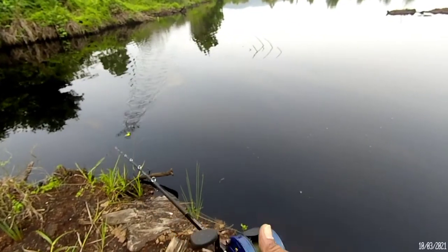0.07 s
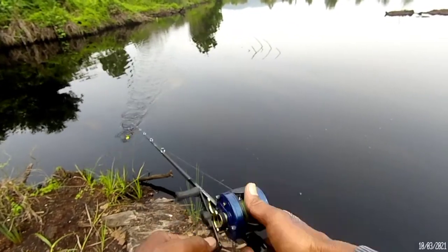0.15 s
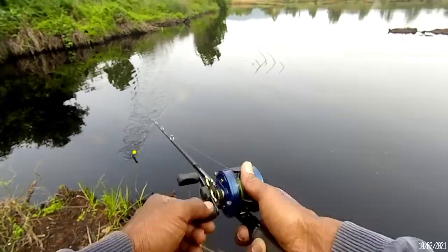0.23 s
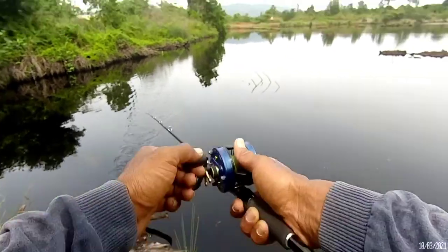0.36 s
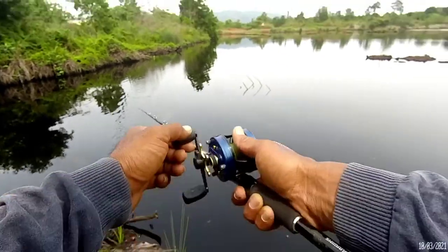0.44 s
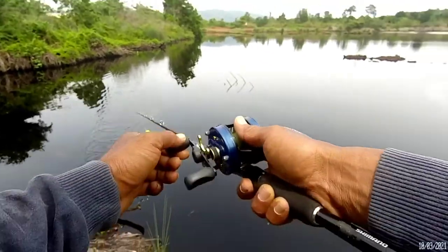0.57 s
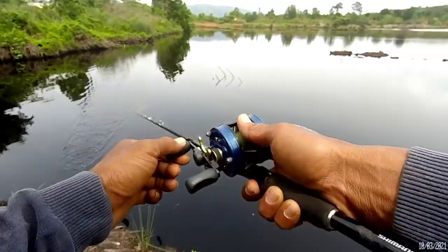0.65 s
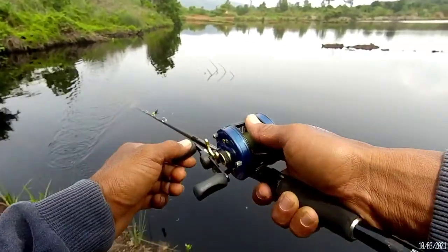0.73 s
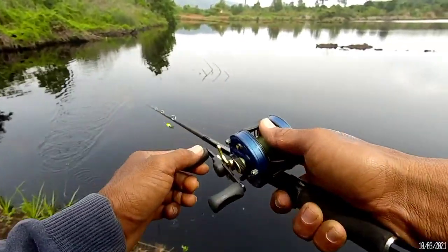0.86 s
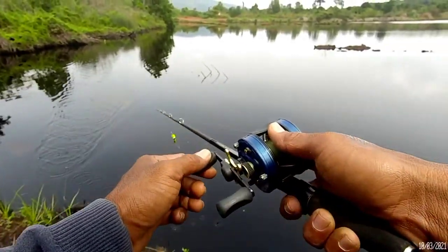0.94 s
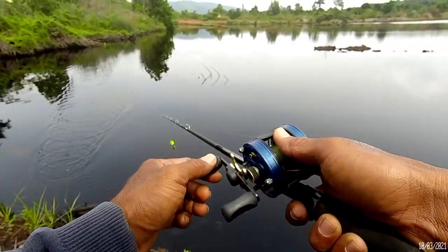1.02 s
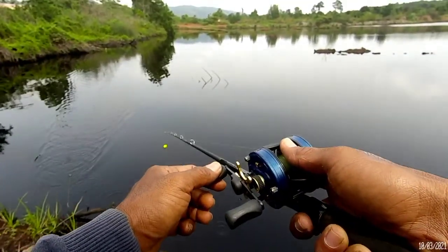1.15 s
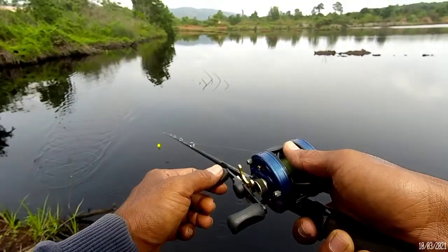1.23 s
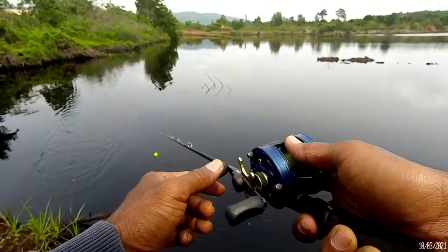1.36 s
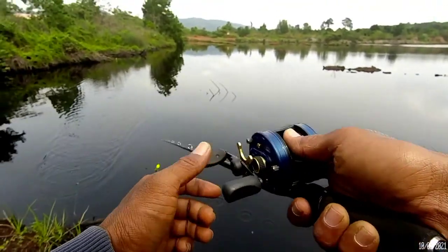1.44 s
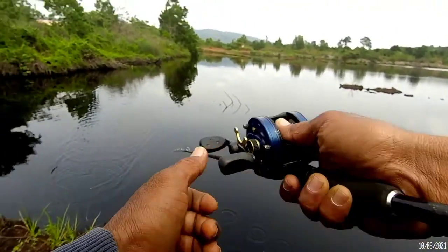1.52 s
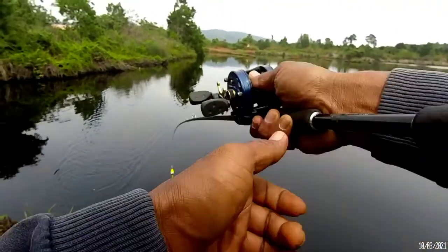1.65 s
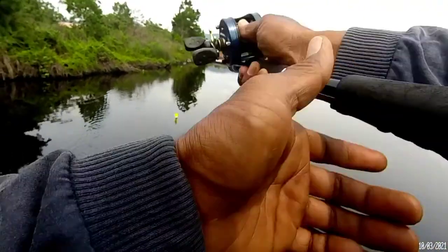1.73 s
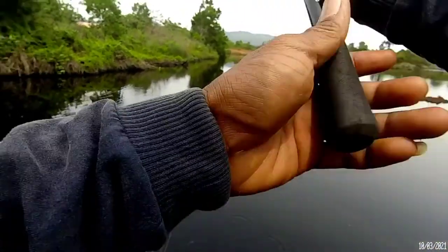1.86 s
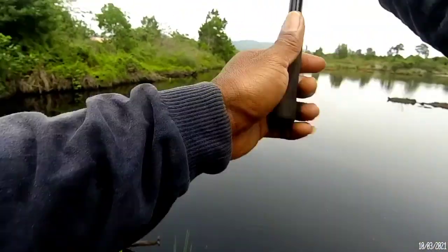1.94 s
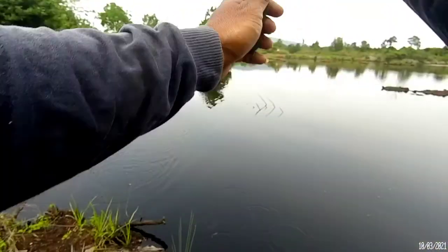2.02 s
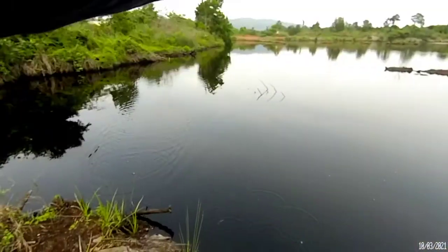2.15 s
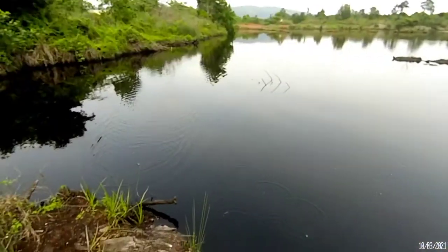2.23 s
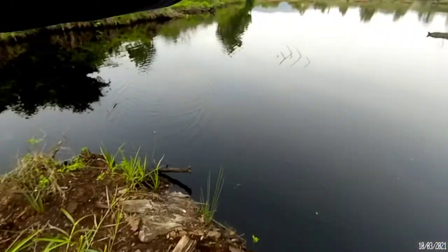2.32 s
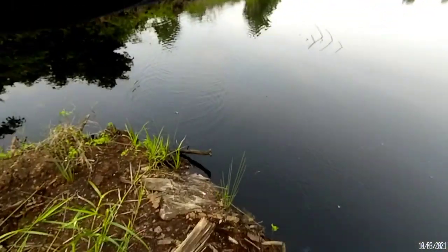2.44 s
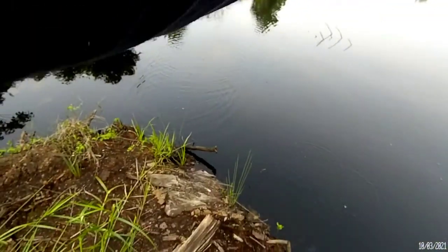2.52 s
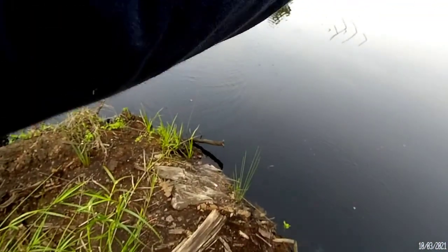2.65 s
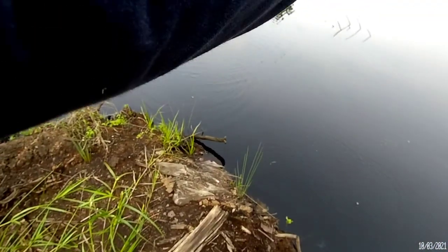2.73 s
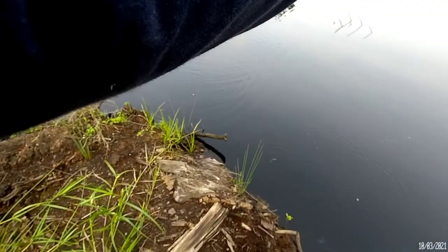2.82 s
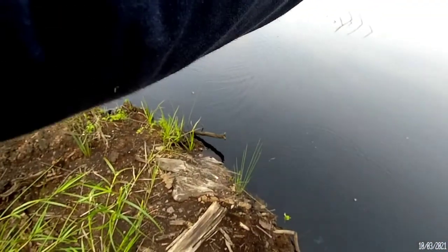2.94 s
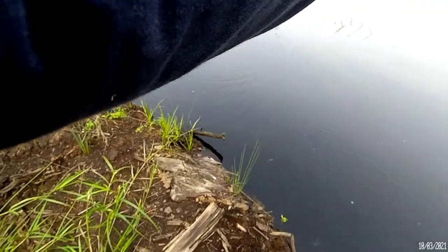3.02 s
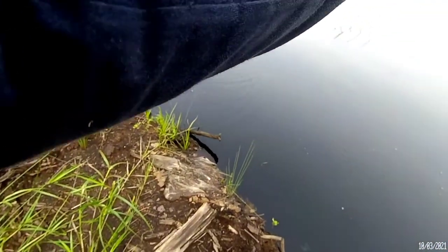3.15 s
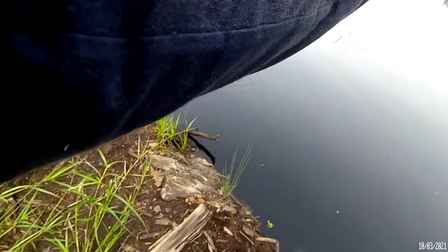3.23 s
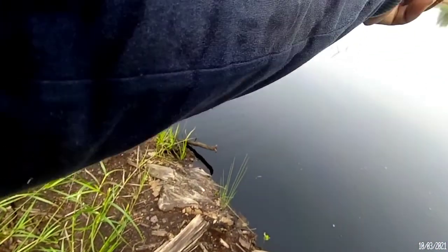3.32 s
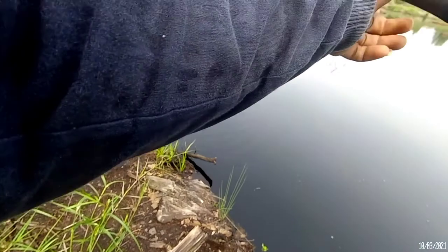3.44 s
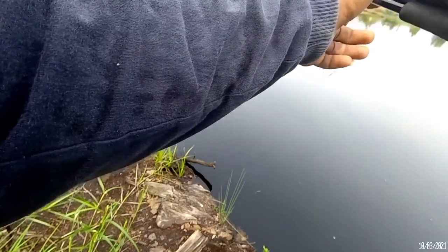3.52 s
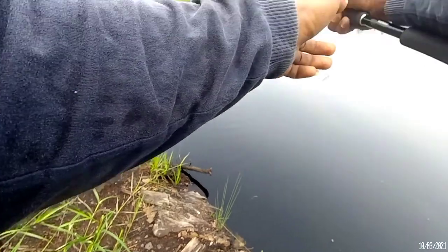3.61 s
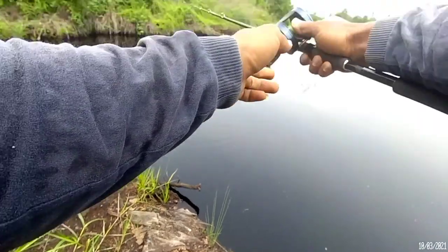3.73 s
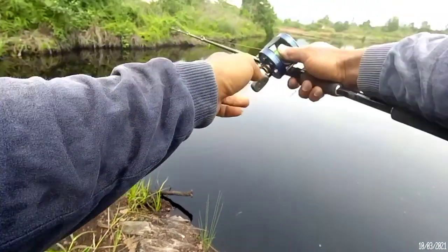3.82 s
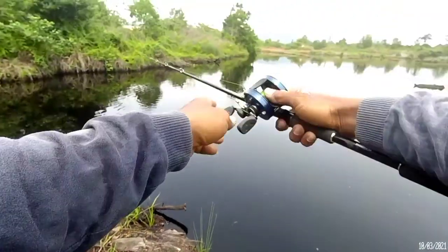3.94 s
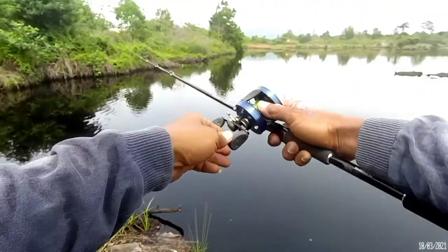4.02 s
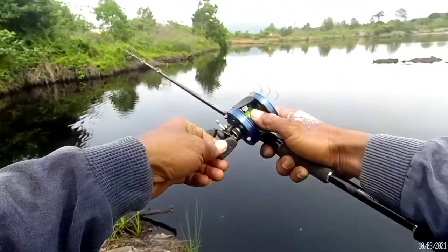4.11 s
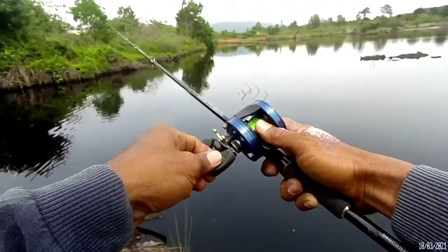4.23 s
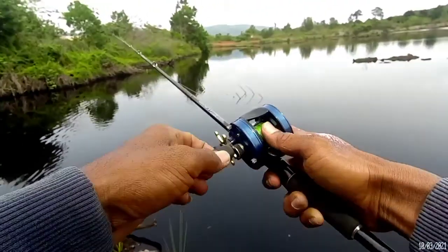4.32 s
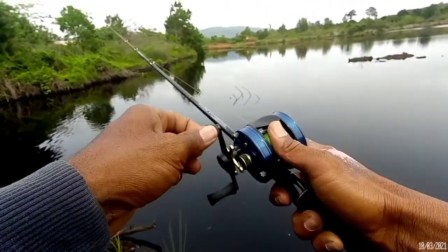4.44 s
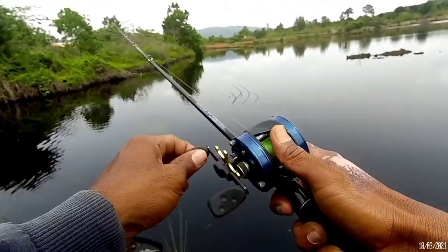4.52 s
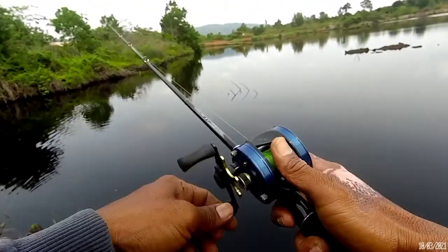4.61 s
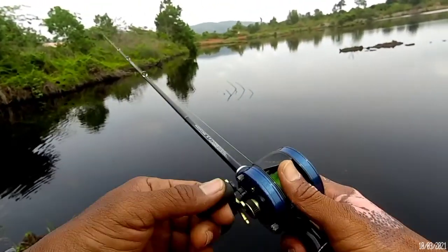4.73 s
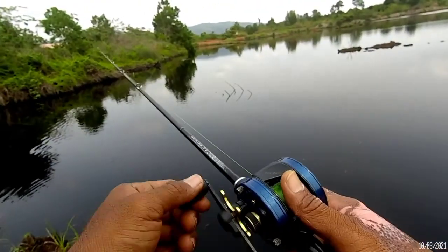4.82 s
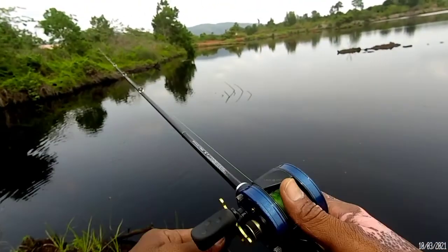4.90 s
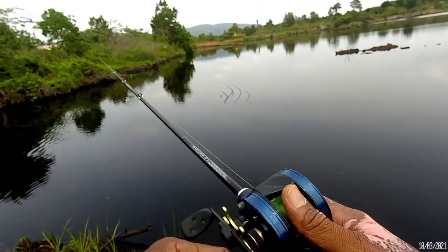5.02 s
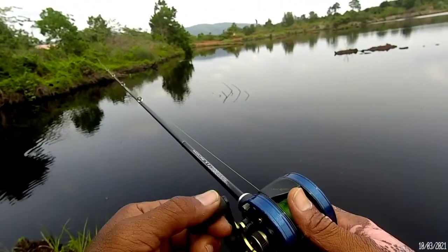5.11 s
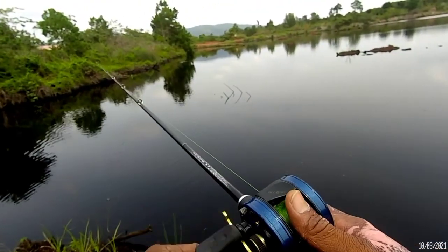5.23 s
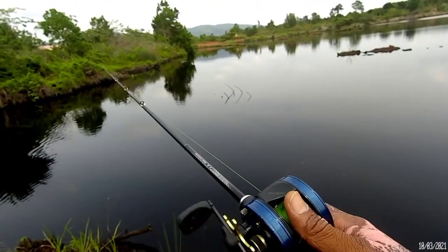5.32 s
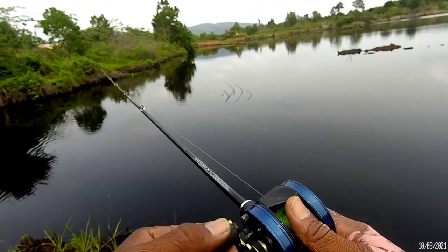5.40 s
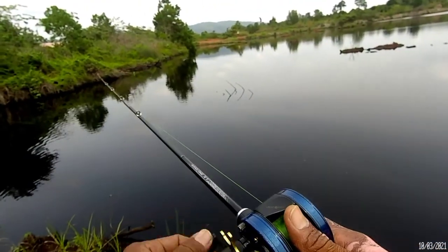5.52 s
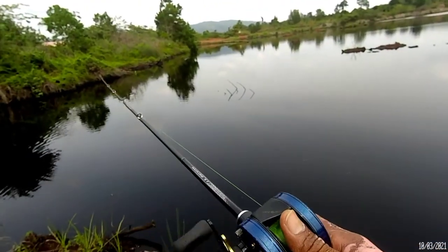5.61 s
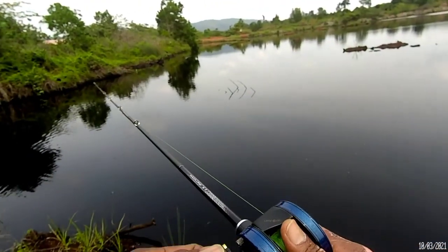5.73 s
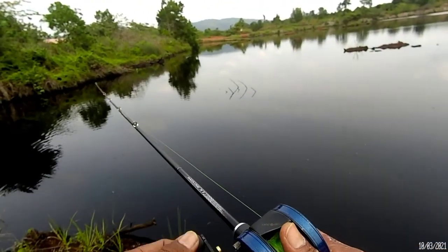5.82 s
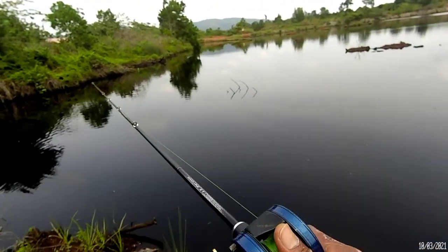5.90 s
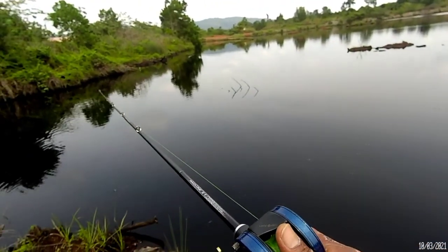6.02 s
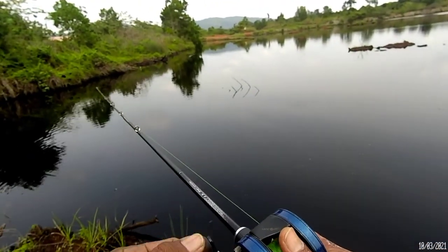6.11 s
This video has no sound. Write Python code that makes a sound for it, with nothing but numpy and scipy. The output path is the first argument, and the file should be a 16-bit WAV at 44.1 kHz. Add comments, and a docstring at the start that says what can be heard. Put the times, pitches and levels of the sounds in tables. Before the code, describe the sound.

A fishing reel's release snaps, the rod whips, the spool whirs with sinking pitch, then the handle clacks and soft winding begins by a pond.

```python
"""A fishing reel with a spinning spool is cast at a pond, heard by a microphone on the angler's chest.
Noise bursts and ringing tones make the thumb bar snap and, later, the handle clack the gears back in.
In between, filtered noise makes the whip of the rod and the spool's whir, which sinks as line pays out.
Winding is soft gear and line noise. Ticks, creaking fingers and rubbing sleeves surround it.
Behind lie gliding bird whistles, a pulsed insect trill, and low rumble, hum, hiss and air."""
import sys
import numpy as np
from scipy import signal
from scipy.fft import rfft, irfft
from scipy.io import wavfile
from scipy.ndimage import map_coordinates

SR = 44100
rng = np.random.default_rng(int(sys.argv[2]) if len(sys.argv) > 2 else 0)


def to_wav(sig):
    """Store sig (one row per channel, or 1-D mono) as 16-bit WAV at the path in sys.argv[1].

    Samples outside -1..1 are clipped; the rate is SR.
    """
    pcm = np.clip(np.atleast_2d(sig), -1, 1) * 32767
    pcm = np.round(pcm).astype(np.int16)
    wavfile.write(sys.argv[1], SR, pcm.T)  # frames by channels


N = 271656
T = np.arange(N) / SR  # time of each sample [s]
HZ = np.arange(N // 2 + 1) * SR / N  # frequency of each spectrum step [Hz]

# metal blows in the clutch: (time [s], level over the first 10 ms [dB], decay [s], struck part's pitch [Hz],
# boost at that pitch [dB], frame ring against the crack [dB], housing knock against the blow [dB])
CLUTCH_BLOWS = [(1.4988, -33.5, 0.0016, 10400, -2.5, -26.5, -20.5),
                (1.503, -14, 0.0007, 6000, 11, -16.5, -20), (1.5043, -22, 0.00093, 13000, 10, -26, -22.5),
                (1.507, -18, .001, 5480, 20.5, -28, -18), (4.3396, -47.5, 0.00097, 7380, -8, -19.5, -11),
                (4.3467, -20.5, 0.0016, 14750, 21, -20, -10.5),
                (4.3535, -28.5, 0.0025, 10380, 11, -16, -14), (4.398, -32, 0.00274, 10100, 12.5, -9, -16),
                (4.3996, -28.5, 0.00103, 14700, 21, -9, -9), (4.4015, -37, .0015, 700, 46, -28, -20)]
# ringing tones of the reel's frame and side plates: (pitch [Hz], level [dB], time to fall by 60 dB [s])
FRAME_TONES = [(1733, -18.5, 0.11), (2087, -29, 0.22), (3206, -3.5, 0.04), (3420, -8, .03),
               (3686, -14.5, .06), (4110, -4.5, 0.041), (4488, 2.5, 0.0192), (5695, -6, 0.023),
               (5987, 0, 0.0141), (6087, -3.5, 0.019), (5910, -4, 0.013), (9800, -19, 0.11),
               (10150, -0.5, 0.029), (12330, -27, .039), (13080, -8, 0.0157)]
# the housing's dull knock under each blow: (centre [Hz], width [Hz], level [dB])
HOUSING_RESONANCES = [(490, 145, -8.5), (740, 200, -8), (1305, 340, -14), (2170, 270, -2), (2923, 380, 3.5)]

# resonances of the spinning spool, which sink with its speed: (centre [Hz], width [Hz], level [dB])
WHIR_RESONANCES = [(3370, 670, -4), (4188, 740, 2), (5347, 385, -2), (6750, 2000, -6.5)]
# the spool's high sizzle, which sinks likewise: (centre [Hz], width [Hz], level [dB])
SIZZLE_RESONANCES = [(8024, 1350, -2.5), (10546, 1540, 0.5), (12320, 900, -4), (15000, 3240, 2.5)]
# resonances of the side plates, which keep their pitch: (centre [Hz], width [Hz], level [dB])
PLATE_RESONANCES = [(1587, 280, -3), (2261, 532, 2.5)]
# the spool's rim grazes, once in mid-flight and again under the thumb:
# (time of peak [s], level at peak [dB], rise [s], fall [s])
RIM_GRAZES = [(3.17, -51.5, .05, 0.161), (3.92, -62, .035, .035)]
# resonances of the winding gears: (centre [Hz], width [Hz], level [dB])
GEAR_RESONANCES = [(3493, 1570, 0), (1466, 1090, -3), (8190, 6800, -6)]

# swishes of rod and line: (time of peak [s], level at peak [dB], rise [s], fall [s], centre of the rub [Hz])
ROD_SWISHES = [(.42, -56.5, 0.06, 0.0514, 7540), (1.94, -42, 0.0416, 0.0296, 8630),
               (2.295, -35.5, 0.0203, 0.106, 12100), (2.328, -37, 0.0353, 0.0648, 4560),
               (4.105, -49.5, 0.032, 0.0342, 10500)]
# clear ticks of line, guides and fingers: (time [s], level before the shared trim [dB], pitch [Hz])
CLEAR_TICKS = [(0.0494, -44, 2425), (0.0684, -45.5, 4230), (0.0964, -45, 5560), (0.7521, -50.5, 1817),
               (1.104, -50.5, 1713), (2.086, -41.5, 3800), (2.108, -45, 13000), (2.217, -44, 9800),
               (2.2812, -28, 9920), (2.4719, -35, 5085), (2.492, -43, 897), (2.523, -39, 1453),
               (2.5474, -31.5, 14000), (2.9616, -41.5, 4395), (3.0335, -39.5, 4370), (3.0743, -40, 2800),
               (4.0795, -40, 8590), (4.1072, -41.5, 9030), (4.1425, -45.5, 1900), (4.5825, -45, 12400),
               (4.7255, -43.5, 1853), (4.745, -48.5, 3990), (5.6737, -45, 1720), (5.8172, -42.5, 12080)]
# fingers shift on the grip: (time of peak [s], level at peak [dB])
GRIP_SHIFTS = [(.1, -61), (.28, -63), (2.2, -55), (4.12, -59), (4.71, -64), (5.66, -67)]
# how briskly the arms move, as the level of the rubbing sleeves: (time [s], level [dB])
SLEEVE_EFFORT = [(.05, -58.5), (.35, -63), (.55, -72), (1.7, -66.5), (1.9, -56), (2.35, -53.5), (2.8, -59),
                 (4.0, -61), (4.2, -58.5), (4.55, -64.5)]

# a bird's arched whistles: (start [s], level [dB])
BIRD_CALLS = [(.15, -69), (1.09, -72), (4.25, -64), (4.935, -59.5), (5.70, -68), (5.89, -66)]
# glide of one whistle, before each call's slight detuning: (time from its start [s], pitch [Hz])
WHISTLE_GLIDE = [(0, 5400), (.03, 5850), (.052, 5800), (.072, 5300), (.086, 4500), (.1, 3500)]
# loudness of the insect's trill: (time [s], level [dB])
TRILL_LEVEL = [(0, -81), (.6, -74), (1.6, -73), (3, -83), (4.5, -73.5), (6.16, -70)]

# spectrum of the air on the microphone: (frequency [Hz], level [dB])
AIR_SPECTRUM = [(5, 1.5), (14, -1), (28, -1), (50, -21), (100, -25.5), (250, -48.5), (800, -72.5)]
# gusts that the arms push over the microphone: (time of peak [s], level at peak [dB], rise [s], fall [s])
ARM_GUSTS = [(1.93, -34, 0.0525, 0.081), (2.4, -18, 0.0764, .095), (2.8, -41, 0.224, 0.29),
             (4.345, -24, 0.0212, .055)]
# spectrum of the steady low rumble: (frequency [Hz], level [dB])
RUMBLE_SPECTRUM = [(8.8, -28.5), (15, 2.5), (27, -1), (38, -15.5), (65, -10), (82, -14.5), (170, -26),
                   (195, -26.5), (255, -28), (281, -28.5), (412, -31), (510, -29.5), (551, -34.5),
                   (1260, -48), (1500, -53.5), (1950, -79), (3300, -120)]
# spectrum of the faint hiss: (frequency [Hz], level [dB])
HISS_SPECTRUM = [(700, -2), (1600, 2), (2800, 0), (4200, -4), (7000, -3), (7700, -5.5), (8300, 1.5),
                 (9000, 0), (12000, 0.5), (15400, 2)]
# tones of the hum: (pitch [Hz], level before the swell [dB])
HUM_TONES = [(172.3, -64.5), (254, -63.5), (509, -65)]
# gain as the hum swells: (time [s], level [dB])
HUM_SWELL_LEVEL = [(0, -7.5), (1.5, -0.5), (4.6, -5), (5.3, 5.5), (6.16, 6.5)]

# the spool is flung up to speed, loses it steadily and is stopped by the thumb
LAUNCH_S, SPIN_UP_S, STOP_S, BRAKE_S = 2.26, .06, 4.0, .09
TOP_TURNS_PER_S, DRAG_TURNS_PER_S2 = 165, 73
TAKE_UP_S = 0.221  # the line takes this long to run freely
# levels at top speed before the pulsing; each grows as this power of speed
PLATES_DB, PLATES_POWER = -51.5, 1.205
WHIR_DB, WHIR_POWER = -47, 1.62
SIZZLE_DB, SIZZLE_POWER = -46, 1.505
FLICKS_PER_S = 30  # loose loops of line flick the frame at random
FLICK_DB, FLICK_S = .5, .0025  # mean surge against the even whirr, and its decay

# winding in: the gears hold their mean level, the wet line grows louder in the guides
WIND_START_S, GEARS_DB, GUIDES_DB, GUIDES_DB_PER_S = 4.38, -62, -69.5, 5

TICK_DECAY_S, TICK_REF_HZ, TICK_DECAY_SLOPE = 0.00295, 2000, 0.384  # higher ticks die sooner
STRAY_PER_S = 6  # faint extra ticks at random moments
# base level before effort and trim, mean random extra, middle pitch, and spread to either side
STRAY_DB, STRAY_SPREAD_DB, STRAY_HZ, STRAY_OCTAVES = -56, 1.5, 2500, .5
GRIP_S = 0.024  # rise and fall of each shift of the fingers
BREEZE_DB, RUMBLE_DB = -45.5, -38.5
TOP_HZ = 15450  # upper edge of the sound


def amp(db):
    """Turn decibels into gain."""
    return 10 ** (np.asarray(db) / 20)


def unit(x):
    """Scale to an rms (average strength) of 1."""
    return x / np.sqrt(np.mean(x ** 2))


def curve(rows, axis=1):
    """Join one column of a table by straight lines in time."""
    rows = np.array(rows)
    return np.interp(T, rows[:, 0], rows[:, axis])


def noise():
    """Make white noise."""
    return rng.standard_normal(N)


def walk(rate):
    """Make a smooth random wander of spread 1, quicker for a higher rate in Hz."""
    return unit(irfft(rfft(noise()) * np.exp(-(HZ / rate) ** 2), N))


def waver(hz, width):
    """Make a tone whose strength and phase wander."""
    return walk(width) * np.sin(2 * np.pi * hz * T) + walk(width) * np.cos(2 * np.pi * hz * T)


def swell(s, rise, fall):
    """Rise smoothly to 1 at time s and fall smoothly."""
    return np.exp(-((T - s) / np.where(T < s, rise, fall)) ** 2 / 2)


def colour(x, points):
    """Filter by a (Hz, dB) spectrum that falls away above its last point; rms 1."""
    hz, db = np.transpose(points)
    level_db = np.interp(np.log(HZ + 1), np.log(hz), db)
    gain = amp(level_db) / np.maximum(HZ / hz[-1], 1) ** 2
    return unit(irfft(rfft(x) * gain, N))


def bell(f, hz, width):
    """Response of one resonance, with gain 1 at its centre."""
    return 1j * f * width / (hz ** 2 - f ** 2 + 1j * f * width)


def resonate(x, modes):
    """Pass through steep (Hz, width, dB) resonances; rms 1."""
    gain = sum(amp(db) * np.abs(bell(HZ, hz, width)) ** 2 for hz, width, db in modes)
    return unit(irfft(rfft(x) * gain, N))


def add(out, s, x):
    """Mix a short sound in at time s."""
    i = int(s * SR)
    out[i:i + len(x)] += x[:N - i]


def frame_ring(t):
    """The frame rings at many pitches, each dying away at its own rate."""
    ring = 0
    for hz, db, t60 in FRAME_TONES:
        tone = np.sin(2 * np.pi * (hz * t + rng.random()))
        ring = ring + amp(db) * tone * np.exp(-np.log(1000) * t / t60)
    return ring


def clutch(part_width_hz=1600, low_hz=1900, tail_db=-26, tail_s=0.00564, knock_s=0.00268,
           knock_lag_s=0.0007965, rattle_db=-55, rattle_s=0.0344):
    """Each blow is a short crack, coloured by the struck part, that rings the frame and knocks the housing."""
    out, t = np.zeros(N), T[:SR // 5]
    f = np.fft.rfftfreq(len(t), 1 / SR)
    first_10_ms = slice(SR // 100)
    small = 1j * f / (1j * f + low_hz)  # small parts radiate little bass
    housing = sum(amp(db) * bell(f, hz, width) for hz, width, db in HOUSING_RESONANCES)
    for s, db, decay, part_hz, boost_db, ring_db, knock_db in CLUTCH_BLOWS:
        fade = np.exp(-t / decay) + amp(tail_db) * np.exp(-t / tail_s)
        crack = rng.standard_normal(len(t)) * fade
        # loose parts settle
        crack += amp(rattle_db) * rng.laplace(size=len(t)) * np.exp(-t / rattle_s)
        part = bell(f, part_hz, min(part_width_hz, part_hz / 4))
        body = small * (small + amp(boost_db) * part)
        blow = irfft(rfft(crack + amp(ring_db) * frame_ring(t)) * body, len(t))
        thud = rng.standard_normal(len(t)) * np.exp(-t / knock_s)
        knock = irfft(rfft(thud) * housing, len(t))
        add(out, s, amp(db) * blow / np.std(blow[first_10_ms]))
        add(out, s + knock_lag_s, amp(db + knock_db) * knock / np.std(knock[first_10_ms]))
    return out


def spool_speed():
    """Turns per second: quick spin-up, steady loss to drag, then the thumb's brake; floored at 1."""
    coast = TOP_TURNS_PER_S - DRAG_TURNS_PER_S2 * (T - LAUNCH_S - SPIN_UP_S)
    spin_up = np.clip((T - LAUNCH_S) / SPIN_UP_S, 0, 1)
    brake = np.clip((STOP_S - T) / BRAKE_S, 0, 1)
    return np.maximum(coast * spin_up * brake, 1)


def flicks():
    """Loose line gives short surges of random size at random moments."""
    out, t = np.zeros(N), T[:SR // 30]
    for place, size in rng.random((int(FLICKS_PER_S * N / SR), 2)):
        add(out, place * N / SR, 2 * size * amp(FLICK_DB) * np.exp(-t / FLICK_S))
    return out


def rim_graze(speed, turn, order=153, top_hz=14600, spread_hz=1000, sharp=1.8, uneven_db=1.2):
    """The grazing rim squeaks at a fixed multiple of the turning rate, up to a top pitch."""
    squeak_hz = np.minimum(order * speed, top_hz)
    squeak = walk(spread_hz) * np.sin(2 * np.pi * np.cumsum(squeak_hz) / SR)
    contact = sum(amp(db) * swell(s, rise, fall) for s, db, rise, fall in RIM_GRAZES)
    once_a_turn = np.exp(sharp * np.cos(turn))
    return unit(squeak * once_a_turn) * contact * amp(uneven_db * walk(12.4))


def spool(throb=0.14, slap_db=4.0, flutter_db=1.5056, sag=0.22, sag_turns_per_s=110, thumb_db=-57):
    """Line slaps off the slowing spool, pulsing with each turn; its rim squeaks and the thumb rubs it to a stop."""
    speed = spool_speed()
    share = speed / TOP_TURNS_PER_S
    turn = 2 * np.pi * np.cumsum(speed * (1 + 0.0087 * walk(17.5))) / SR
    take_up = np.clip((T - LAUNCH_S) / TAKE_UP_S, 0, 1)
    pulse = (1 + throb * np.cos(turn)) * amp(flutter_db * walk(25)) * take_up
    slaps = amp(slap_db * np.minimum(walk(720), 2.5)) * np.hypot(1, flicks())
    plates = resonate(noise() * slaps, PLATE_RESONANCES) * amp(PLATES_DB) * share ** PLATES_POWER
    # reading the noise ever more slowly sinks its pitch once the spool has lost its first speed
    travel = np.cumsum(np.minimum(speed / sag_turns_per_s, 1) ** sag)
    even_whir = resonate(noise() * slaps, WHIR_RESONANCES)
    whir = map_coordinates(even_whir, [travel], order=3) * amp(WHIR_DB) * share ** WHIR_POWER
    even_sizzle = resonate(noise() * amp(2.75 * walk(1100)), SIZZLE_RESONANCES)
    sizzle = map_coordinates(even_sizzle, [travel], order=5) * amp(SIZZLE_DB) * share ** SIZZLE_POWER
    thumb_press = swell(STOP_S - BRAKE_S / 2, BRAKE_S, 0.016)
    thumb = resonate(noise(), SIZZLE_RESONANCES) * amp(thumb_db) * thumb_press
    return pulse * (plates + whir + sizzle) + rim_graze(speed, turn) + thumb


def winding(grain_db=3, uneven_db=1.5, guide_hz=12900, guide_width_hz=2400):
    """The gears rustle softly as the handle turns, and wet line hisses through the guides."""
    gear_grain = amp(grain_db * walk(550) + uneven_db * walk(10.8))
    gears = resonate(noise() * gear_grain, GEAR_RESONANCES)
    line_grain = amp(grain_db * walk(500) + 2.6 * walk(21))
    guides = resonate(noise() * line_grain, [(guide_hz, guide_width_hz, 0)])
    guides_level = amp(GUIDES_DB + GUIDES_DB_PER_S * (T - WIND_START_S))
    return (T > WIND_START_S) * (gears * amp(GEARS_DB) + guides * guides_level)


def swishes(grain_db=3.0, flutter_db=1.8, width=1.45, low_hz=1150, low_width_hz=1500, low_db=-13.0,
            low_linger=1.41):
    """Rod and line sweep past with grainy friction; harder strokes add more low whoosh, which lingers."""
    out, hardest_db = 0, max(row[1] for row in ROD_SWISHES)
    for s, db, rise, fall, hz in ROD_SWISHES:
        grain = amp(grain_db * walk(1240) + flutter_db * walk(120))
        rub = resonate(noise() * grain, [(hz, width * hz, 0)]) * swell(s, rise, fall)
        low = resonate(noise() * grain, [(low_hz, low_width_hz, 0)])
        whoosh = low * swell(s, rise, low_linger * fall)
        out = out + amp(db) * (rub + amp(low_db + db - hardest_db) * whoosh)
    return out


def stray_ticks(follow=0.47):
    """Faint contacts fall at random and are stronger while the arms move."""
    effort_db = curve(SLEEVE_EFFORT) - np.mean(curve(SLEEVE_EFFORT))
    stray = []
    for place, a, b in rng.random((int(STRAY_PER_S * N / SR), 3)):
        i = int(place * N)
        db = STRAY_DB + follow * effort_db[i] - STRAY_SPREAD_DB * np.log(1 - a)
        hz = STRAY_HZ * 2 ** (STRAY_OCTAVES * (2 * b - 1))
        stray.append((T[i], db, hz))
    return stray


def ticks(trim_db=-2, width=0.88, ring=0.91, snap_db=-6, snap_s=.0005):
    """Small damped contacts each give a snap, a scrape and a brief ring at one pitch."""
    out, t = np.zeros(N), T[:SR // 20]
    f = np.fft.rfftfreq(len(t), 1 / SR)
    for s, db, hz in CLEAR_TICKS + stray_ticks():
        decay = TICK_DECAY_S * (TICK_REF_HZ / hz) ** TICK_DECAY_SLOPE
        contact = rng.standard_normal(len(t)) + ring * np.sin(2 * np.pi * hz * t) / 2
        tick = irfft(rfft(contact * np.exp(-t / decay)) * bell(f, hz, width * hz) ** 2, len(t))
        snap = amp(snap_db) * rng.standard_normal(len(t)) * np.exp(-t / snap_s)
        add(out, s, amp(db + trim_db) * (tick / np.std(tick[:SR // 300]) + snap))
    return out


def handling(rest_db=-73, uneven_db=7, brisk_db=-54, rustle_power=1.3, rustle_db=-1, rustle_hz=3400,
             rustle_width_hz=12000, grain_db=2.5, flutter_db=1.5):
    """Fingers creak on the grip, more when they shift; sleeves give a dull rub and a fine rustle."""
    creak_bursts = amp(uneven_db * np.minimum(walk(41), 2.5))
    creaks = resonate(noise() * creak_bursts, [(1732, 780, 1), (2675, 1210, -1)])
    grip = amp(rest_db) + sum(amp(db) * swell(s, GRIP_S, GRIP_S) for s, db in GRIP_SHIFTS)
    rub = resonate(noise() * amp(3.02 * walk(12.6)), [(360, 380, 0), (530, 240, -2)])
    rustle_grain = amp(grain_db * walk(1200) + flutter_db * walk(91))
    rustle = resonate(noise() * rustle_grain, [(rustle_hz, rustle_width_hz, 0)])
    effort = amp(curve(SLEEVE_EFFORT) - brisk_db)
    # the rustle needs brisker movement than the rub
    sleeves = rub * effort + rustle * amp(rustle_db) * effort ** rustle_power
    return creaks * grip + amp(brisk_db) * sleeves


def bird(fade=.6):
    """A thin whistle arches and drops, each call slightly detuned."""
    out = np.zeros(N)
    s, hz = np.transpose(WHISTLE_GLIDE)
    t = T[:int(s[-1] * SR)]
    envelope = np.sin(np.pi * t / s[-1]) ** fade
    for start, db in BIRD_CALLS:
        pitch = np.interp(t, s, hz) * (1 + 0.00864 * rng.standard_normal())
        add(out, start, amp(db) * envelope * np.sin(2 * np.pi * np.cumsum(pitch) / SR))
    return out


def insect(hz=8060, width_hz=110, upper_hz=8400, upper_width_hz=280, upper_db=-5, pulses_per_s=10.0,
           sharp=.6):
    """A thin trill comes in quick pulses, with a broader steady buzz just above it."""
    rate = pulses_per_s * (1 + .1 * walk(2.98))
    beat = unit(np.exp(sharp * np.sin(2 * np.pi * np.cumsum(rate) / SR)))
    trill = waver(hz, width_hz) * beat
    buzz = amp(upper_db) * waver(upper_hz, upper_width_hz)
    return unit(trill + buzz) * amp(curve(TRILL_LEVEL))


def background(hiss_db=-63, hum_width_hz=8, hum_waver=0.47, drone_hz=55, drone_db=-47):
    """Low rumble, a wavering hum and drone, faint hiss and buffets of air."""
    rumble = colour(noise(), RUMBLE_SPECTRUM) * amp(RUMBLE_DB)
    hum = 0
    for hz, db in HUM_TONES:
        steady = np.sin(2 * np.pi * hz * T)
        hum = hum + amp(db) * (steady + hum_waver * waver(hz, hum_width_hz))
    drone = amp(drone_db) * waver(drone_hz, 7.1)
    hiss = colour(noise(), HISS_SPECTRUM) * amp(hiss_db + .5 * walk(8))
    gusts = sum(amp(db) * swell(s, rise, fall) for s, db, rise, fall in ARM_GUSTS)
    air = colour(noise(), AIR_SPECTRUM) * (amp(BREEZE_DB) + gusts)
    return rumble + hum * amp(curve(HUM_SWELL_LEVEL)) + drone + hiss + air


def scene():
    """Everything arrives at the one microphone."""
    reel = clutch() + spool() + winding()
    angler = swishes() + ticks() + handling()
    surroundings = bird() + insect() + background()
    return (reel + angler + surroundings)[None]


def record(dry):
    """The loudest peaks are rounded and the top is cut steeply."""
    rounded = .9 * np.tanh(dry / .9)
    low_pass = signal.ellip(8, .2, 70, TOP_HZ, fs=SR, output="sos")
    return signal.sosfilt(low_pass, rounded)


dry = scene()
out = record(dry)
to_wav(out)
```